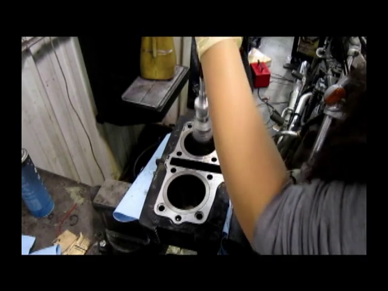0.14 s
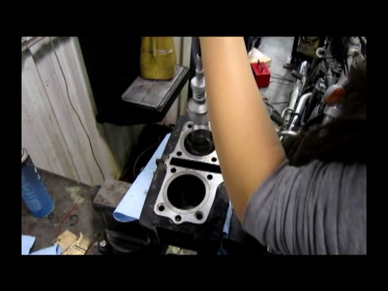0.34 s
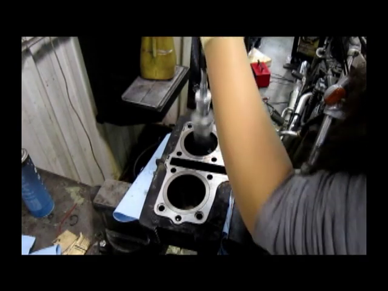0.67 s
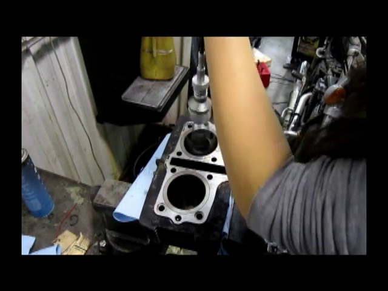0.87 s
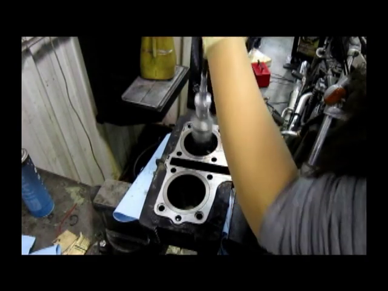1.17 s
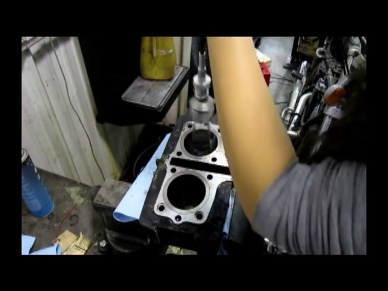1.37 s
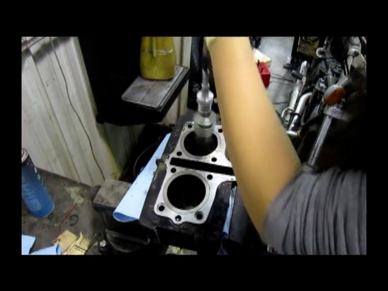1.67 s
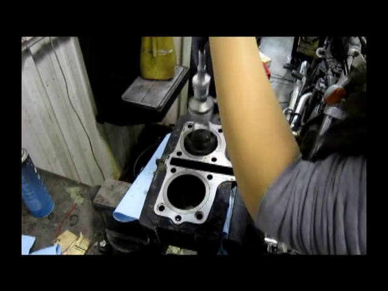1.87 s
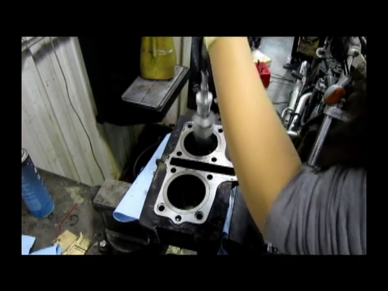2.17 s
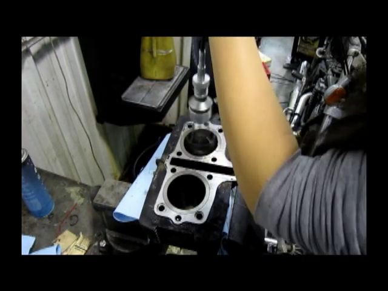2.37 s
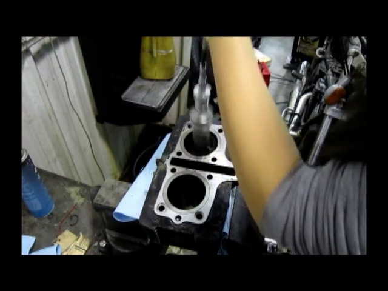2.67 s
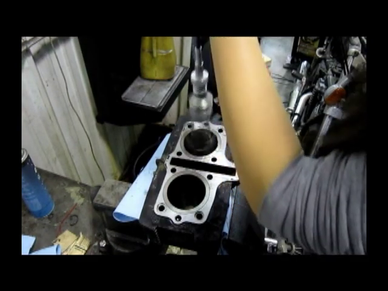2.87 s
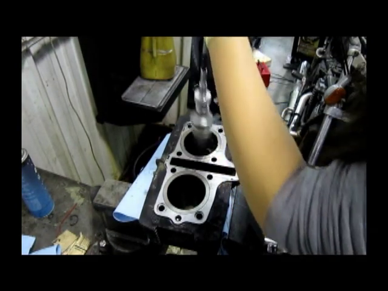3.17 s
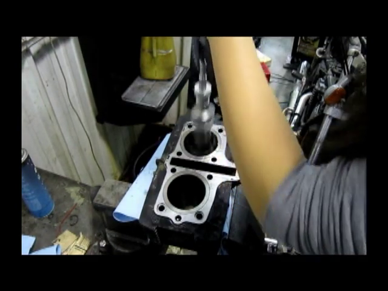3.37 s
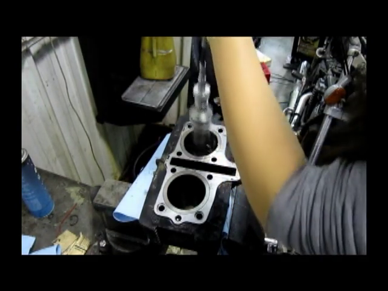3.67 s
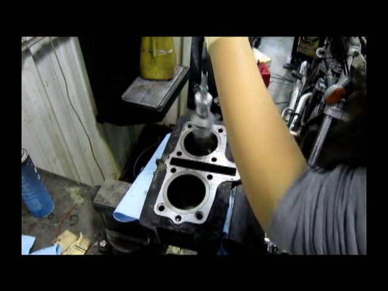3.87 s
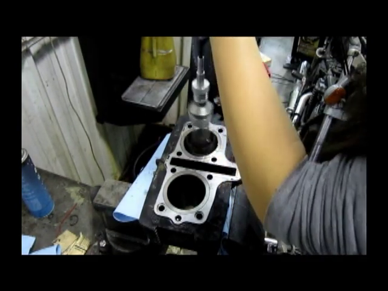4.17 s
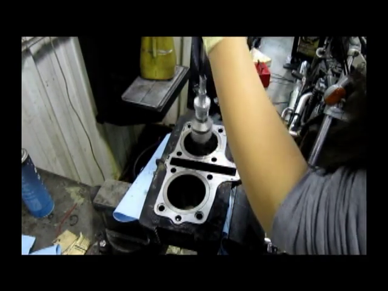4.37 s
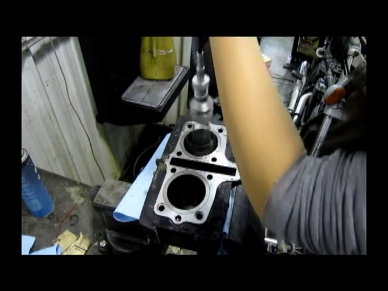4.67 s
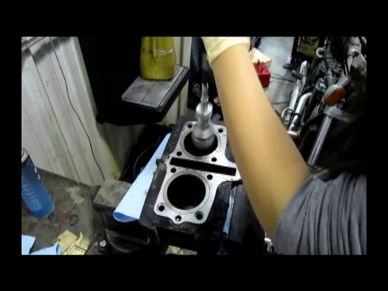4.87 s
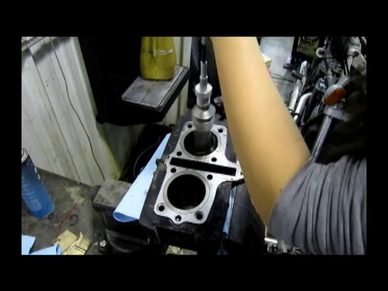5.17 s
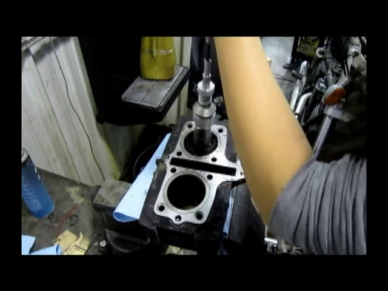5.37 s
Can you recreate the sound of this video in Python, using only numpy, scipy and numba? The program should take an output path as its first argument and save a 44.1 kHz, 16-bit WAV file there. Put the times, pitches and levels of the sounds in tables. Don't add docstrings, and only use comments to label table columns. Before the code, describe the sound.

An electric drill is already running, close to a small, rough-sounding microphone in a workshop. Its nasal gear whine, around 800 to 900 hertz with buzzing overtones, throbs quickly and is blurred by loose gears rattling the housing. Stones scrape gritty and dry inside an iron cylinder, swelling with each stroke, with tiny high ticks of grit. The whine first drifts slightly down, then surges upward at about 1.2, 1.6, 2.6, 3.6, 4.0, 4.6 and 4.9 seconds, each time sagging back; the 2.6 jump is strongest. Soft dull knocks of the block on the bench come near 1.9, 2.5, 3.1, 3.9 and 5.0 seconds. A faint mains hum lies beneath, and from 3.5 a thin wavering tone sings quietly. After 5.1 seconds the trigger is released and the pitch slides steeply down, with several low knocks around 5.3 to 5.5. Still turning slowly, it ends at about 5.5.

```python
import sys
import numpy as np
from scipy import signal
from scipy.fft import rfft, irfft
from scipy.io import wavfile
from scipy.ndimage import uniform_filter1d, map_coordinates
from numba import njit

SR = 44100
rng = np.random.default_rng(int(sys.argv[2]) if len(sys.argv) > 2 else 0)


def nominal_scale(level):
    x = np.asarray(level, float) / 20
    return 10 ** x


def to_wav(sig):
    pcm = np.clip(np.atleast_2d(sig), -1, 1) * 32767
    pcm = np.round(pcm).astype(np.int16)
    wavfile.write(sys.argv[1], SR, pcm.T)


N = 243873

PINION, WHEEL = 4, 45
MAINS_HZ, CAMERA_HZ = 60, 12000
RELEASE_S = 5.12


def level(x, db):
    return x * nominal_scale(db) / np.sqrt(np.mean(x ** 2))


def spectrum_db(hz, table):
    table_hz, db = np.transpose(table)
    return np.interp(np.log(hz), np.log(table_hz), db)


@njit
def svf(x, hz, width):
    y, band, low = np.empty(len(x)), 0., 0.
    g, k = np.tan(np.pi * hz / SR), width / hz
    for i in range(len(x)):
        v = (band + g * (x[i] - low)) / (1 + g * (g + k))
        band, low, y[i] = 2 * v - band, low + 2 * g * v, k * v
    return y


def walk(rate):
    hold = int(SR / rate)
    steps = np.repeat(rng.standard_normal(N // hold + 1), hold)
    return 1.47 * uniform_filter1d(uniform_filter1d(steps, hold), hold)[:N]


def sparse(rate, spread_db):
    size = nominal_scale(spread_db * np.minimum(rng.exponential(size=N), 3.0))
    struck = rng.random(N) < rate / SR
    return level(struck * rng.uniform(-1.14, 1, N) * size, 0)


def runout(teeth, once_db, twice_db, lag):
    turn = 2 * np.pi * (teeth / WHEEL - lag)
    return level(nominal_scale(once_db * np.cos(turn) + twice_db * np.cos(2 * turn + 0.68)), 0)


def hum(time):
    phase = 2 * np.pi * 2 * MAINS_HZ * time + 0.29 * walk(8.2)
    return nominal_scale(-50 + 1.3 * walk(17)) * np.sin(phase)


def bench(time):
    hz, db, from_s = 768, -47, 3.5
    fade_in = np.clip((time - from_s) * 2, 0, 1)
    return nominal_scale(db + 3.0 * walk(8)) * fade_in * np.sin(2 * np.pi * hz * time + .3 * walk(8))


# (time [s], level [dB], frequency [Hz], t60 [s])
BLOCK_KNOCKS = [(1.85, -42, 160, .2), (2.471, -33, 387, .1), (3.05, -42, 54, .5), (3.855, -30, 380, .15),
                (3.9, -35, 450, .06), (3.96, -34, 385, .12), (5.02, -28.5, 570, .12), (5.34, -39, 140, .3),
                (5.365, -35, 580, .12), (5.39, -39, 110, .3), (5.47, -34, 140, .2), (5.495, -33, 110, .25)]


def knocks(time):
    out = np.zeros(N)
    for start, db, hz, t60 in BLOCK_KNOCKS:
        age = np.maximum(time - start, 0)
        onset = 1 - np.exp(-age / 0.0016)
        decay = np.exp(-np.log(1000) * age / t60)
        out += nominal_scale(db) * onset * decay * np.sin(2 * np.pi * hz * age)
    return out


def shop(x, t60, wet_db):
    age = np.arange(int(.3 * SR)) / SR
    tail = rng.standard_normal(len(age)) * np.exp(-np.log(1000) * age / t60) * (age > .003)
    tail /= np.sqrt(np.sum(tail ** 2))
    return x + nominal_scale(wet_db) * signal.fftconvolve(x, tail)[:N]


def ticks():
    hz, width_hz = 5870.0, 500.
    once = svf(sparse(45, spread_db=-3.5), hz, width_hz)
    return level(svf(once, hz, width_hz), -48.0)


# (frequency [Hz], spectral level [dB per Hz])
SCRAPE_COLOUR = [(18, -49), (30, -16.5), (118, -10), (333, -9.5), (716, -4.5), (877, 2.5), (1150, -10.5),
                 (1380, 1), (2020, -3.5), (3460, -3.5), (6500, -6), (8450, -61), (14300, -120)]


def scrape(time, teeth):
    drag = nominal_scale(1.28 * walk(14) + 0.69 * np.cos(2 * np.pi * MAINS_HZ * time))
    grain = rng.standard_normal(N) + nominal_scale(-2.5) * sparse(1500, spread_db=2.5)
    force = grain * drag * runout(teeth, once_db=0.73, twice_db=0.0, lag=0.35)
    colour = nominal_scale(spectrum_db(np.fft.rfftfreq(N, 1 / SR) + 1, SCRAPE_COLOUR))
    return level(irfft(rfft(force) * colour, N), -29.0)


# (time [s], extra level [dB])
HONE_STROKES = [(0.0, 1.5), (.34, 3.5), (1.0, 4.5), (1.38, 4), (1.83, 4), (2.45, 3.5), (2.88, 1), (3.32, 0),
                (3.86, 2.5), (4.28, 5), (4.79, 0), (5.05, 0), (5.5, 3.5)]


def pressure(time):
    stroke_s, slack_db, slack_s = .09, -4.5, 0.011
    swell = sum(db * np.exp(-((time - start) / stroke_s) ** 2) for start, db in HONE_STROKES)
    lull = sum(slack_db * np.exp(-((time - row[0]) / slack_s) ** 2) for row in LOAD_DROPS)
    return swell + lull


# (frequency [Hz], width [Hz], level [dB])
HOUSING_MODES = [(964, 180, -9), (1357, 133, 2.5), (1893, 500, -10.5), (2562, 520, -0.5), (3565, 730, -4)]


def rattle(teeth):
    bunch = nominal_scale(7.5 * np.cos(2 * np.pi * teeth / PINION))
    bunch = bunch * runout(teeth, once_db=-1.0, twice_db=2.2, lag=0.34)
    force = (rng.standard_normal(N) + nominal_scale(-7.5) * sparse(900, spread_db=-2.5)) * bunch
    out = 0
    for k, (hz, width_hz, db) in enumerate(HOUSING_MODES):
        hz, width_hz = float(hz), 1.36 * width_hz
        mode = svf(svf(force, hz, width_hz), hz, width_hz)
        out = out + (-1) ** k * nominal_scale(db + 0.88 * walk(9)) * mode
    return level(out, 0)


# (time [s], tooth rate [Hz])
HELD_SPEED = [(0.0, 899.0), (0.21, 855.1), (0.311, 855.4), (0.545, 811.7), (0.832, 858.5), (0.995, 829.2),
              (1.85, 842.0), (2.18, 804.9), (2.36, 822.7), (2.439, 811.4), (3.166, 805.7), (3.33, 852.0),
              (3.543, 822.5), (4.638, 872.0), (4.99, 932.7), (5.082, 916.1), (5.423, 480.0), (5.53, 378.6)]
# (start [s], rise [s], gain [Hz], run-down [s])
LOAD_DROPS = [
    (1.155, 0.106, 250.9, 0.384),
    (1.639, 0.122, 249.7, 0.35),
    (2.607, 0.154, 327.5, 0.33),
    (3.581, 0.129, 283.8, 0.353),
    (4.035, 0.128, 255.0, 0.345),
    (4.56, 0.123, 250.1, 0.226),
    (4.923, 0.149, 243.7, 0.443),
]


def speed(time):
    hz = np.interp(time, *np.transpose(HELD_SPEED))
    for start, rise, gain_hz, fall in LOAD_DROPS:
        up = np.clip((time - start) / rise, 0, 1)
        down = np.clip((time - start - rise) / fall, 0, 1)
        hz = hz + gain_hz * np.sin(np.pi / 2 * up) * (1 - down) ** 1.67
    return hz


# (frequency [Hz], level [dB])
CASE_FIRST = [(400, -18), (700, -13), (830, -4), (970, .1), (1040, -9), (1100, -20), (1200, -22)]
CASE_SECOND = [(780, -37), (1000, -45), (1450, -46), (1610, -53.5), (1710, -41), (1820, -33), (2100, -36),
               (2340, -31)]
CASE_THIRD = [(1150, -47), (1500, -41), (2170, -43), (2410, -32.5), (2560, -32), (2760, -30.5), (3100, -28),
              (3500, -34.5)]
CASE_FOURTH = [(1550, -32), (2000, -34), (2900, -28), (3220, -40), (3400, -39), (3650, -36), (4120, -48),
               (4500, -55)]
BRAKED_LEAST = [-36, -37]


def radiation(time, hz, racing, braking):
    first = spectrum_db(hz, CASE_FIRST) - 3.0 * racing + 2.5 * braking
    late_s, take_up_s, take_up_db = .03, .025, -8
    take_up = sum(np.exp(-((time - row[0] - late_s) / take_up_s) ** 2) for row in LOAD_DROPS)
    middle = []
    for k, case, least in zip((2, 3), (CASE_SECOND, CASE_THIRD), BRAKED_LEAST):
        db = spectrum_db(k * hz, case) + take_up_db * take_up
        floor = least - 9 * (time - RELEASE_S)
        middle.append(db + braking * np.maximum(floor - db, 0))
    fourth = spectrum_db(4 * hz, CASE_FOURTH) - 9 * braking
    return [first, *middle, fourth, 0, 0]


# (number, level [dB], lower pinion sideband [dB], upper pinion sideband [dB],
# swing per wheel turn [dB], lag [turns])
TOOTH_HARMONICS = [(1, -37.5, -37, -12.5, 1.8, 0.59), (2, 1, -32, -24, 6.1, 0.38),
                   (3, 2, -15, -8, 3.37, 0.46), (4, 3, -10, -9, 3.55, 0.36), (5, -49, 2, -15, 2, 0.23),
                   (6, -47, -10, -16, 2.3, 0.3)]


def whine(time, teeth, hz):
    dead_hz, dead_width_hz, dead_db = 3010, 180, -14
    change = np.gradient(uniform_filter1d(hz, size=1500)) * SR
    racing, coasting = np.clip(change / 1500, 0, 1), np.clip(-change / 500, 0, 1)
    braking = np.clip((time - RELEASE_S) * 20, 0, 1)
    mesh = 2 * np.pi * (teeth + .017 * walk(45) + (.013 + .045 * racing) * walk(220))
    wobble = 2 * np.pi * .12 * walk(90) * (1 - braking)
    heard_db = radiation(time, hz, racing, braking)
    out = 0
    for (k, db, lower_db, upper_db, swing_db, lag), gain_db in zip(TOOTH_HARMONICS, heard_db):
        stack = 0
        for order, part_db in ((k, 0), (k - 1 / PINION, lower_db), (k + 1 / PINION, upper_db)):
            dip_db = dead_db * coasting * np.exp(-((order * hz - dead_hz) / dead_width_hz) ** 2)
            total_db = db + gain_db + part_db + dip_db + 0.89 * braking + 1.1 * walk(50)
            phase = order * mesh + (k == 1) * wobble + 7 * rng.random()
            stack = stack + nominal_scale(total_db) * np.sin(phase)
        throb = runout(teeth, swing_db, swing_db / 2.0, lag)
        out = out + stack * throb ** (1 - 0.64 * racing - .5 * braking)
    shaft = nominal_scale(-58.5 + 1.6 * walk(30)) * np.sin(mesh / PINION)
    return np.sqrt(2) * out + shaft


def scene():
    time = np.arange(N) / SR
    hz, press_db = speed(time), pressure(time)
    teeth = np.cumsum(hz) / SR
    stones = (scrape(time, teeth) + ticks()) * nominal_scale(0.52 * (press_db - press_db.mean()))
    drill = shop(whine(time, teeth, hz), t60=.2, wet_db=-15)
    drill = drill + rattle(teeth) * nominal_scale(-33 + press_db)
    return (drill + stones + hum(time) + knocks(time) + bench(time))[None]


def low_pass(x):
    return signal.sosfilt(signal.butter(12, 14550, fs=SR, output="sos"), x)


def record(dry):
    time = np.arange(N) / SR
    instants = np.arange(0, time[-1] + 1 / CAMERA_HZ, 1 / CAMERA_HZ)
    soft = signal.sosfilt(signal.butter(8, 5900, fs=SR, output="sos"), dry[0])
    soft = signal.lfilter([.08, .84, .08], 1, soft)
    samples = map_coordinates(soft, [instants * SR], order=3, mode="nearest")
    joined = np.interp(time, instants, samples)
    mix = signal.sosfilt(signal.butter(2, 11000, fs=SR, output="sos"), joined)[None]
    return low_pass(mix)


dry = scene()
out = record(dry)
to_wav(out)
```